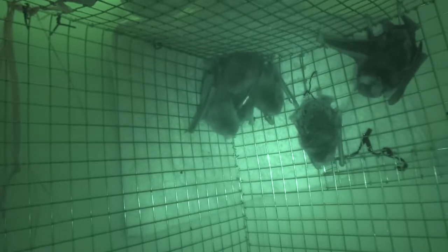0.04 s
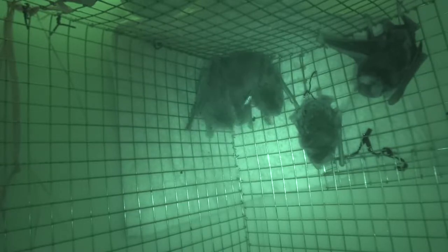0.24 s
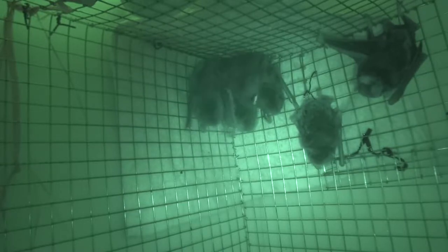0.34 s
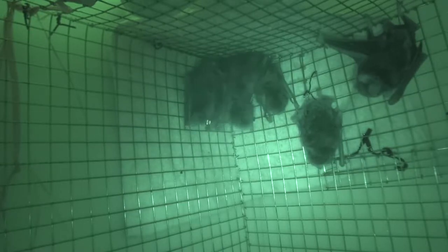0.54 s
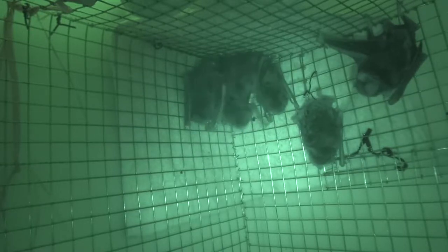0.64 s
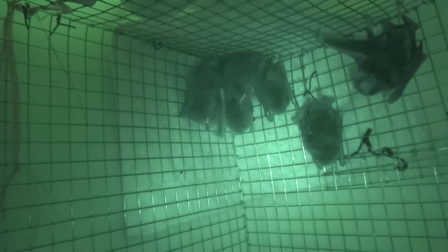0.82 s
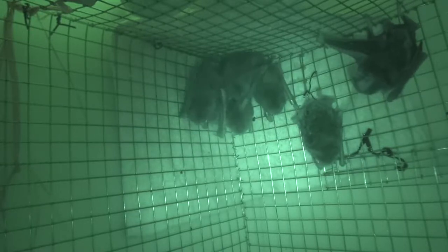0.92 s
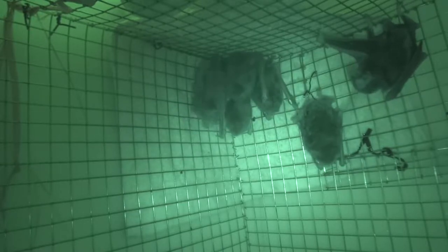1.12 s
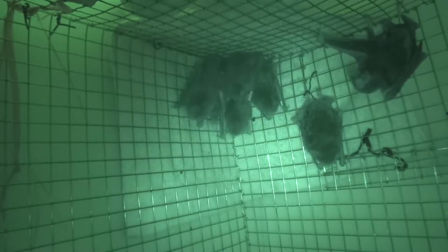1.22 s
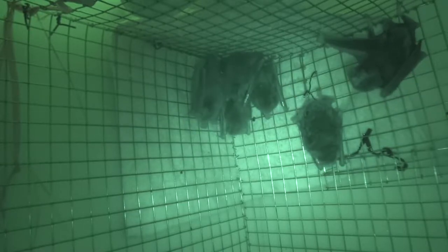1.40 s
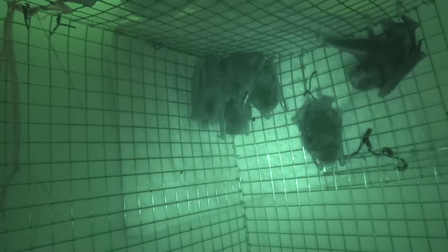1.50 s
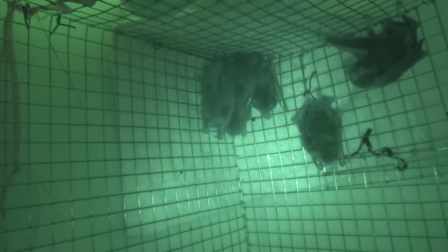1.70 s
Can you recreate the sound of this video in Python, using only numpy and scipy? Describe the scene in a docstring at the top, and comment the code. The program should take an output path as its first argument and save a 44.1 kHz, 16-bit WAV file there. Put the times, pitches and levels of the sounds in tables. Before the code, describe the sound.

Bats squabble in a small mesh enclosure, their harsh, high chirps and hoarse scratches coming in quick runs, then thinning to scattered squeaks. The calls sound centred, with a short bright ring, over faint air noise and machine hum.

```python
"""A small mesh enclosure: bats squabble in a jostling cluster over faint air noise and machine hum.
Each harsh call is a quick run of separate chirps a few milliseconds long: a falling tone near 3 kHz
with strong, fluttering overtones, or a hoarse scratch. The walls add a short bright ring."""
import sys
import numpy as np
from scipy import signal
from scipy.fft import rfft, irfft
from scipy.io import wavfile

SR = 44100
rng = np.random.default_rng(int(sys.argv[2]) if len(sys.argv) > 2 else 0)


def materialize(psi):
    """Save the field psi as 16-bit PCM at rate SR to the path in sys.argv[1].

    A 1-D psi becomes a single channel; in a 2-D psi each row is a channel.
    """
    bounded = np.clip(np.atleast_2d(psi).T, -1, 1)
    quanta = np.round(bounded * 32767).astype(np.int16)
    wavfile.write(sys.argv[1], SR, quanta)


N = 77175

# Air noise spectrum. Each row: frequency in Hz, relative density in dB.
AIR_SPECTRUM = [(22, -27), (46, -0.5), (90, -2.5), (150, -6), (200, -14), (270, -10.5), (400, -22.5),
                (520, -18.5), (800, -25), (1020, -14), (1200, -19), (2500, -25), (5000, -32.5),
                (16000, -36)]
# Air noise width. Each row: frequency in Hz, left-right correlation.
AIR_CORRELATION = [(120, 0.89), (300, 0.24), (1000, 0.64), (4000, 0.75), (15000, 0.63)]
# Air noise balance. Each row: frequency in Hz, left minus right in dB.
AIR_BALANCE = [(100, -5.5), (700, 0), (15000, -0.5)]
# Air noise envelope. Each row: time in seconds, gain in dB.
AIR_ENVELOPE = [(0, 1.5), (.6, -2), (.85, 4)]
# Machine tones. Each row: frequency in Hz, base level in dB, waver rate in Hz, share of the swell.
HUM_TONES = [(56.3, -60.5, 2.9, 1), (114.6, -60, 3, 1), (268, -69, 23, 1), (1022, -72, 19, 0.033)]
# Hum swell. Each row: time in seconds, gain in dB.
HUM_SWELL = [(0, -13.5), (.67, -3.5), (.77, -2), (1.1, 4.5), (1.24, 1.5), (1.36, 2), (1.46, 1), (1.6, 0),
             (1.72, 5)]
# Enclosure decay. Each row: frequency in Hz, T60 in seconds.
RING_T60 = [(500, .29), (3000, 0.17), (7000, 0.17), (14000, 0.09)]
# Enclosure colour. Each row: frequency in Hz, relative gain in dB.
RING_SPECTRUM = [(500, 0), (3000, -1), (4800, 1), (7000, -3), (9500, -4.5), (13000, 1), (16000, -3.5)]
# Nearest walls. Each row: delay in seconds, gain in dB.
WALL_ECHOES = [(.0021, -19.5), (.0075, -22)]
# Hoarse scratches, plus one faint claw tick at 1.012 s from the jostling cluster, made alike. Each row: start
# in seconds, length in seconds, relative level in dB.
RASP_EVENTS = [(0.259, 0.018, -39), (0.3807, 0.0152, -32), (0.449, 0.0025, -33.5), (.4572, 0.0052, -34.5),
               (0.4626, 0.0063, -37), (.472, 0.004, -35), (0.48, 0.0047, -33), (0.554, 0.011, -37),
               (0.61, 0.016, -45), (0.678, 0.0041, -38), (0.775, 0.0074, -52), (0.791, .004, -35),
               (0.8003, 0.0046, -36.5), (0.809, 0.0058, -32.5), (0.821, 0.0033, -34), (.829, 0.0052, -32.5),
               (1.012, 0.011, -52), (1.065, 0.0036, -41), (1.116, 0.0048, -39.5), (1.128, 0.0087, -43),
               (1.144, 0.0064, -45.5), (1.184, 0.0019, -43), (1.326, 0.0017, -48.5), (1.337, 0.0063, -35),
               (1.459, .011, -43.5), (1.614, 0.0036, -46.5), (1.627, 0.0022, -41), (1.6335, 0.001, -36.5)]
# Scratch spectrum. Each row: frequency in Hz, relative gain in dB.
RASP_SPECTRUM = [(500, -58), (1100, -11), (1600, -10), (2300, -4), (3800, -14), (6000, -12), (8500, -7),
                 (11700, 1), (14500, -14), (16000, -31)]
# Chirps. Each row: start in seconds, length in seconds, relative level in dB, mid pitch in Hz,
# pitch fall as a natural-log ratio.
CHIRP_EVENTS = [(0.2247, 0.0056, -28, 2890, 0.11), (0.2303, .007, -26, 3500, 0.15),
                (0.2379, 0.0047, -24, 3746, 0.15), (0.244, 0.0047, -28.5, 3640, 0.13),
                (0.271, 0.017, -38.5, 2770, 0.029), (0.2813, 0.012, -32, 2930, 0.25),
                (.29, 0.0035, -38, 2940, 0.11), (0.293, 0.007, -26.5, 3097, 0.17),
                (0.2996, 0.0049, -26.5, 3206, 0.21), (0.306, 0.0062, -32.5, 3160, 0.35),
                (.315, 0.0051, -24.5, 3446, 0.2), (0.3224, 0.0034, -26.5, 3600, .2),
                (0.351, 0.0088, -35.5, 2570, 0.098), (0.359, 0.0082, -32, 2550, 0.11),
                (0.3674, 0.0084, -35, 2534, 0.28), (0.375, 0.0056, -35.5, 2546, .1),
                (0.3918, 0.0067, -28, 3138, 0.334), (0.401, 0.0052, -26, 3370, 0.12),
                (.489, 0.0043, -26.5, 3520, 0.13), (.497, 0.0034, -24.5, 3825, 0.18),
                (.541, 0.0079, -26, 3260, 0.16), (.5485, 0.0052, -24, 3250, 0.19),
                (0.553, 0.0068, -31, 3270, 0.25), (0.563, 0.0058, -26, 3720, 0.27),
                (0.571, 0.0032, -24, 3780, 0.096), (.581, 0.0065, -32.5, 2760, 0.26),
                (0.593, 0.0082, -52, 2700, 0.066), (0.6246, 0.0075, -24, 3107, 0.34),
                (0.631, 0.011, -29, 3200, 0.2), (.6405, 0.0041, -26, 3180, 0.27),
                (0.648, 0.0041, -24, 3225, 0.22), (0.687, 0.00565, -34, 2410, 0.19),
                (0.693, 0.012, -34.5, 2526, 0.2), (0.704, 0.0062, -35.5, 2615, 0.25),
                (0.7077, 0.0065, -29, 2510, 0.24), (0.7151, 0.0034, -24.5, 3010, 0.26),
                (0.725, 0.0032, -24, 3190, 0.2), (0.7313, 0.0068, -26.5, 3330, 0.32),
                (0.7396, 0.0042, -23, 3580, 0.15), (0.8348, 0.0034, -22.5, 3225, 0.11),
                (0.8385, 0.0047, -28, 3080, 0.025), (0.924, 0.0062, -28.5, 2846, 0.072),
                (0.929, 0.012, -25.5, 3283, 0.18), (0.9396, 0.0054, -23.5, 3324, 0.3),
                (0.948, 0.0058, -28, 3340, .1), (1.076, 0.0024, -30, 3025, 0.11),
                (1.082, 0.0055, -27, 3416, 0.25), (1.2033, .0035, -31.5, 3053, 0.14),
                (1.352, 0.01, -31, 3045, 0.072), (1.4874, 0.0092, -32, 2953, 0.019),
                (1.74, 0.0049, -38, 2900, 0.27)]
# Steeper chirps are hoarser. Each row: pitch fall as a natural-log ratio, roughness from 0 to 1.
ROUGHNESS_BY_FALL = [(.03, 0.03), (.15, 0.17), (.3, 0.52)]
# Larynx harmonics, fundamental first. Each entry: relative level in dB.
LARYNX_DB = [-3.5, 3, -1, 0.5, -0.5, 2]
# Throat and mouth filter. Each row: frequency in Hz, relative gain in dB.
THROAT_RESPONSE = [(400, -71), (850, -39), (1300, -28), (1750, -6), (2700, 0.5), (3100, -3.5), (3600, -8),
                   (4200, 2), (4650, -21.5), (5300, -5.5), (6000, -12.5), (6500, -5), (7200, 2),
                   (8500, -0.5), (10000, 3), (12400, 4.5), (14000, -0.5), (16000, -21)]


def amp(db):
    """Decibels to gain."""
    return 10 ** (np.asarray(db) / 20)


def unit_rms(x):
    """Scale to RMS 1."""
    return x / np.sqrt(np.mean(abs(x) ** 2) + 1e-20)


def at_hz(points, hz):
    """Interpolate a table over log frequency."""
    table_hz, values = np.transpose(points)
    return np.interp(np.log(hz + 1), np.log(table_hz + 1), values)


def envelope(points):
    """dB curve over time to gain per sample."""
    return amp(np.interp(np.arange(N) / SR, *np.transpose(points)))


def colour(x, spectrum):
    """Filter by a dB spectrum."""
    n = x.shape[-1]
    return irfft(rfft(x) * amp(at_hz(spectrum, np.fft.rfftfreq(n, 1 / SR))), n)


def drift(n, rate_hz):
    """Smooth random motion, RMS 1."""
    lowpass = np.exp(-(np.fft.rfftfreq(n, 1 / SR) / rate_hz) ** 2)
    return unit_rms(irfft(rfft(rng.standard_normal(n)) * lowpass, n))


def stereo(a, b, correlation):
    """Correlated channels from two independent signals."""
    mid, side = a * np.sqrt((1 + correlation) / 2), b * np.sqrt((1 - correlation) / 2)
    return np.array([mid + side, mid - side])


def add(mix, start_s, sound):
    """Mix a sound in place."""
    part = mix[round(start_s * SR):][:len(sound)]
    part += sound[:len(part)]


def air(base_db=-59):
    """Low rumble and faint hiss of the room."""
    hz = np.fft.rfftfreq(N, 1 / SR)
    spectrum = stereo(*rfft(rng.standard_normal((2, N))), at_hz(AIR_CORRELATION, hz))
    spectrum *= amp(at_hz(AIR_SPECTRUM, hz) + np.outer([.5, -.5], at_hz(AIR_BALANCE, hz)))
    return amp(base_db) * unit_rms(irfft(spectrum, N)) * envelope(AIR_ENVELOPE)


def machine_hum(waver_depth=0.52, balance_db=-2.5):
    """Wavering machine tones; the low ones swell partway through."""
    t = np.arange(N) / SR
    tones = np.zeros(N)
    for hz, db, waver_hz, swell_share in HUM_TONES:
        waver = 1 + waver_depth * (drift(N, waver_hz) + 1j * drift(N, waver_hz))
        carrier = np.exp(2j * np.pi * (hz * t + rng.random()))
        tones += amp(db) * envelope(HUM_SWELL) ** swell_share * unit_rms((waver * carrier).real)
    return tones * amp([[balance_db / 2], [-balance_db / 2]])


def enclosure(calls, ring_db=-8.3, rise_s=.0018, right_lag_s=.00015, size=16384):
    """A short diffuse ring plus echoes from the nearest walls."""
    noise = stereo(*rng.standard_normal((2, size)), correlation=.62)
    hz, t, frames = signal.stft(noise, SR, nperseg=256)
    decay = amp(-60 * t / at_hz(RING_T60, hz)[:, None])
    ring = signal.istft(frames * decay, SR, nperseg=256)[1]
    onset = np.minimum(np.arange(size) / SR / rise_s, 1) ** 2
    response = colour(ring, RING_SPECTRUM) * onset
    response *= amp(ring_db) / np.linalg.norm(response[0])
    for delay_s, db in WALL_ECHOES:
        add(response[0], delay_s, amp([db]))
        add(response[1], delay_s + right_lag_s, amp([db]))
    return signal.fftconvolve(calls[None], response, axes=1)[:, :N]


def burst(voice, t, length_s, db, overhang_s=.0013):
    """Swell and fade a voice in one sine arch; its energy equals length_s at level db."""
    arch = np.sin(np.pi * np.minimum(t / (length_s + overhang_s), 1))
    gate = np.maximum(arch, 0) ** .8
    return amp(db) * np.sqrt(length_s * SR / len(t)) * unit_rms(voice * gate)


def rasp(length_s, db, size=1024):
    """A burst of bright noise with a low throat resonance: the voice breaking, or a faint claw tick."""
    noise = colour(rng.standard_normal(size), RASP_SPECTRUM)
    return burst(noise, np.arange(size) / SR, length_s, db)


def glide_phase(t, length_s, mid_hz, fall, jitter=0.033, jitter_hz=610):
    """Phase of a falling, jittering tone."""
    pitch_hz = mid_hz * np.exp(fall * (.5 - np.minimum(t / length_s, 1)))
    pitch_hz *= 1 + jitter * drift(len(t), jitter_hz)
    return 2 * np.pi * np.cumsum(pitch_hz) / SR


def larynx(phase, mid_hz, db, roughness, flutter_db=3.8, flutter_hz=550, half_pitch_db=-7.5):
    """Harmonics flutter independently; in a rough chirp the folds also beat at half pitch."""
    tone = np.zeros(len(phase))
    for k, harmonic_db in enumerate(LARYNX_DB, 1):
        offset_db = flutter_db * drift(len(phase), flutter_hz)
        if k == 1:  # the fundamental flutters less and gains on the overtones in soft chirps
            offset_db = offset_db / 2 + 0.77 * (-28 - db)
        partial = np.sin(k * phase + 2 * np.pi * rng.random())
        if k * mid_hz < SR / 2:
            tone += amp(harmonic_db + offset_db) * partial
    return tone * (1 + 2 * roughness * amp(half_pitch_db) * np.cos(phase / 2))


def chirp(length_s, db, mid_hz, fall, size=1024):
    """A falling larynx tone and a share of noise pass through the throat."""
    t = np.arange(size) / SR
    roughness = np.interp(fall, *np.transpose(ROUGHNESS_BY_FALL))
    phase = glide_phase(t, length_s, mid_hz, fall)
    tone = colour(larynx(phase, mid_hz, db, roughness), THROAT_RESPONSE)
    tone /= np.sqrt(np.mean(tone[t < length_s] ** 2))
    noise = unit_rms(colour(rng.standard_normal(size), THROAT_RESPONSE))
    voice = np.sqrt(1 - roughness ** 2) * tone + roughness * noise
    return burst(voice, t, length_s, db)


def bats(gain_db=-1.24):
    """All chirps and scratches of the cluster, mono."""
    calls = np.zeros(N)
    for start_s, length_s, db, mid_hz, fall in CHIRP_EVENTS:
        add(calls, start_s, chirp(length_s, db, mid_hz, fall))
    for start_s, length_s, db in RASP_EVENTS:
        add(calls, start_s, rasp(length_s, db))
    return amp(gain_db) * calls


def scene():
    """Centred bats and their echoes over air and hum."""
    calls = bats()
    return calls + enclosure(calls) + air() + machine_hum()


def record(dry):
    """Low-pass at 16.1 kHz."""
    lowpass = signal.firwin(401, 16100, window=("kaiser", 8), fs=SR)
    return signal.oaconvolve(dry, lowpass[None], "same")


dry = scene()
out = record(dry)
materialize(out)
```